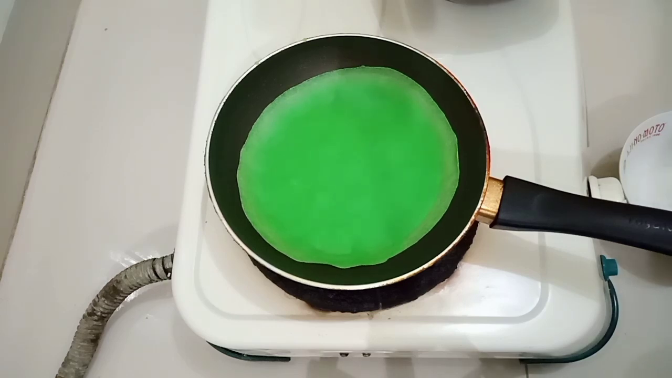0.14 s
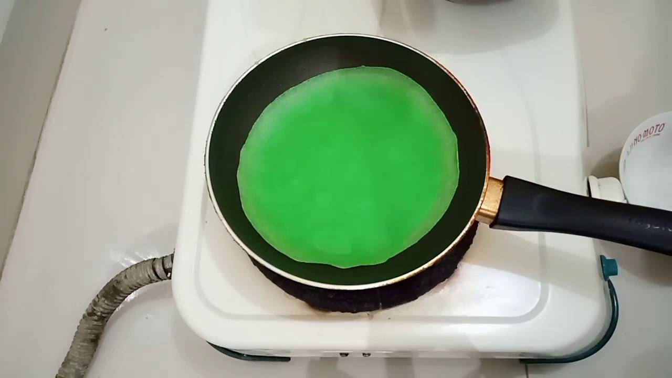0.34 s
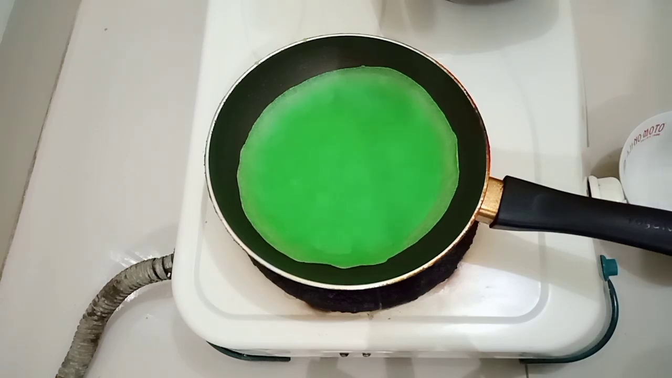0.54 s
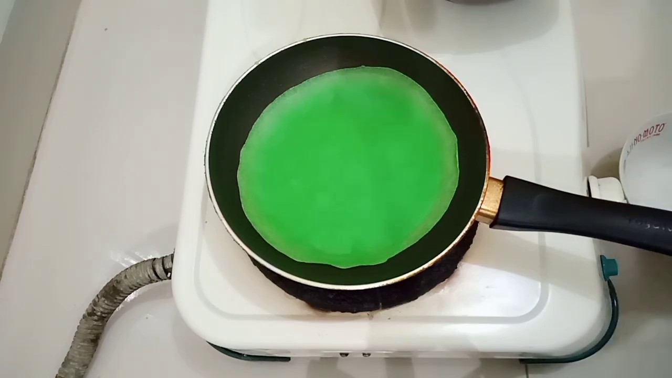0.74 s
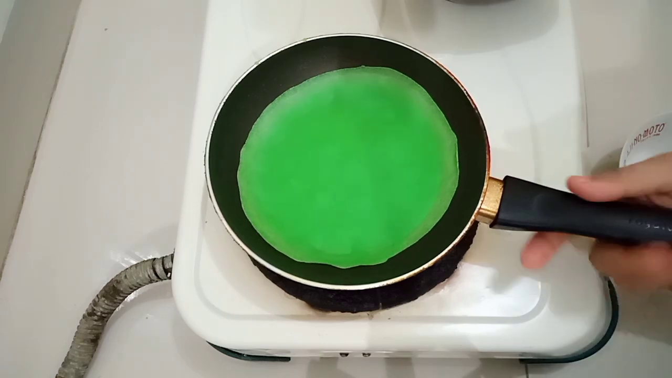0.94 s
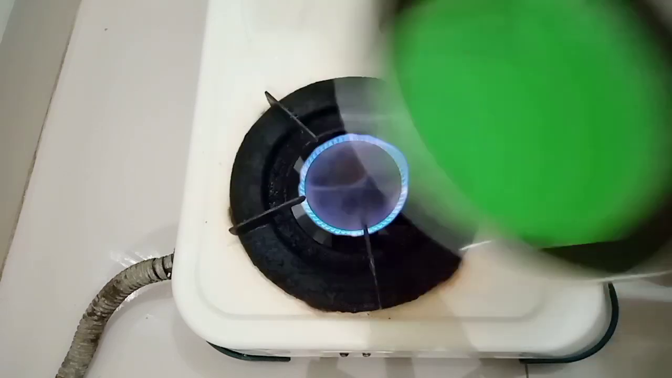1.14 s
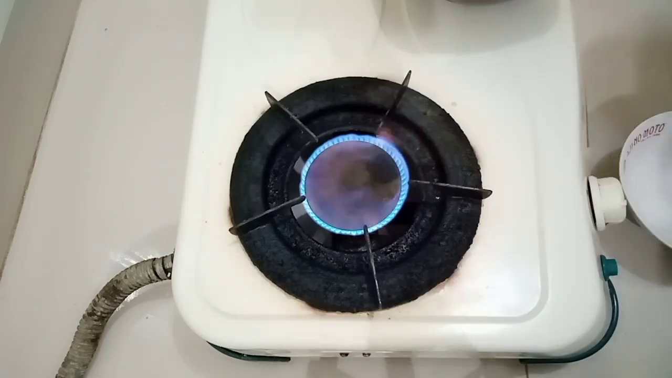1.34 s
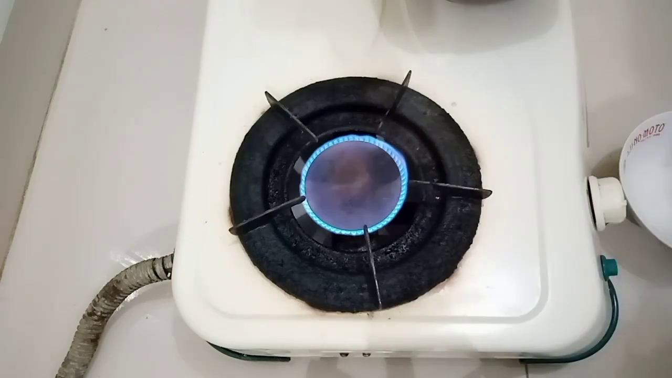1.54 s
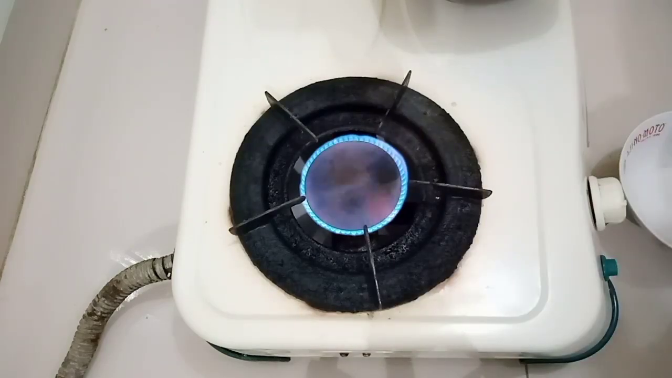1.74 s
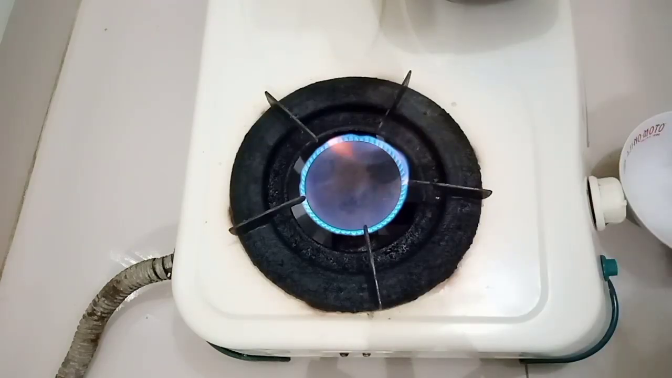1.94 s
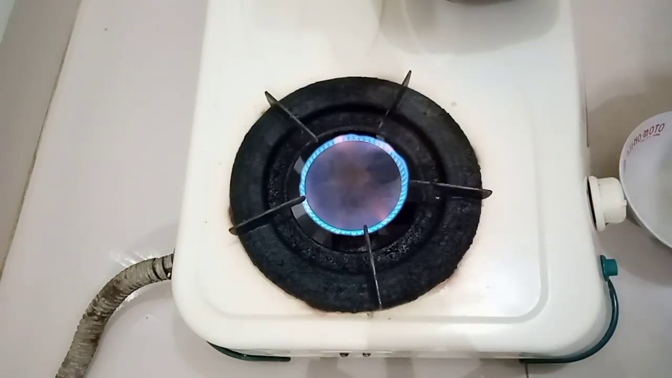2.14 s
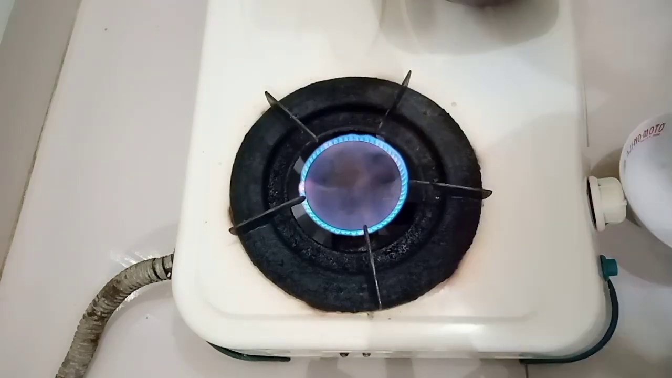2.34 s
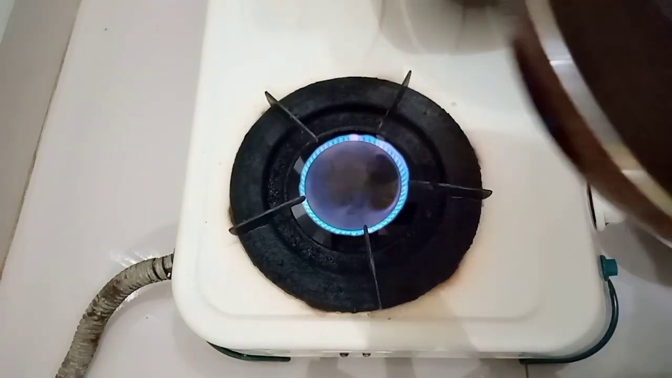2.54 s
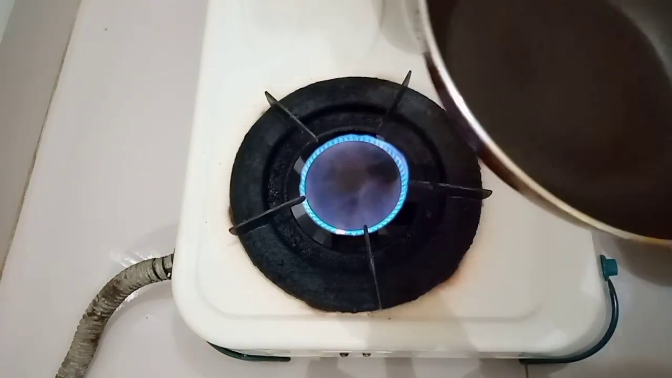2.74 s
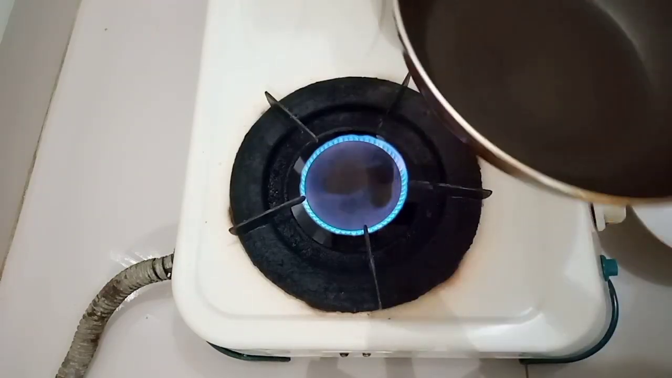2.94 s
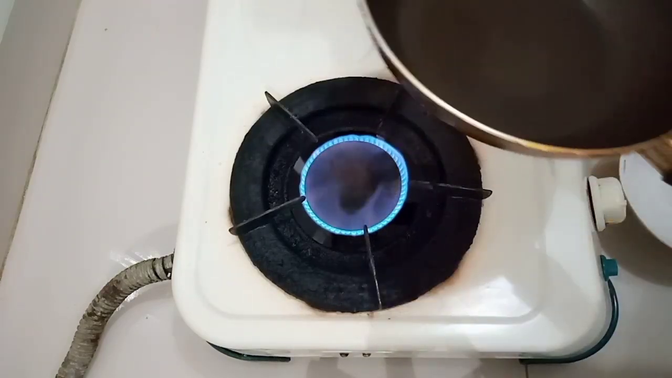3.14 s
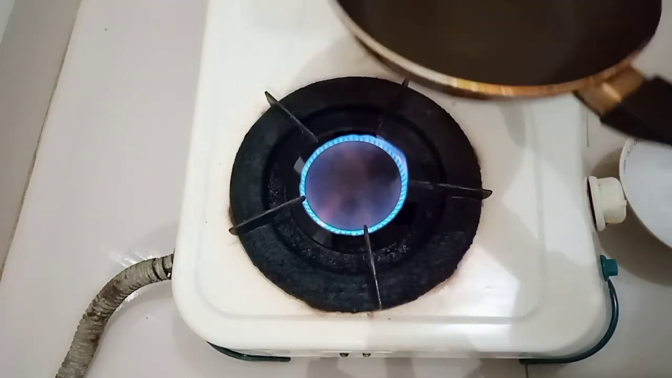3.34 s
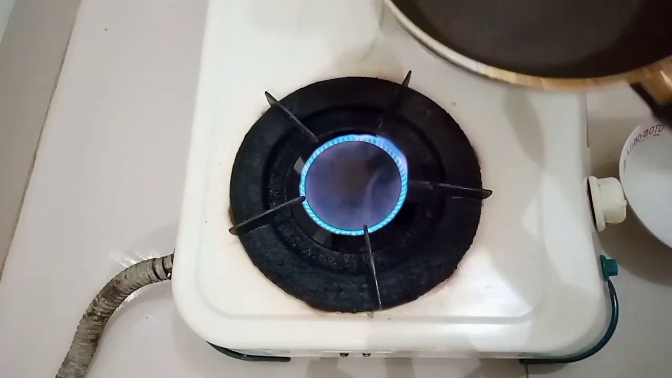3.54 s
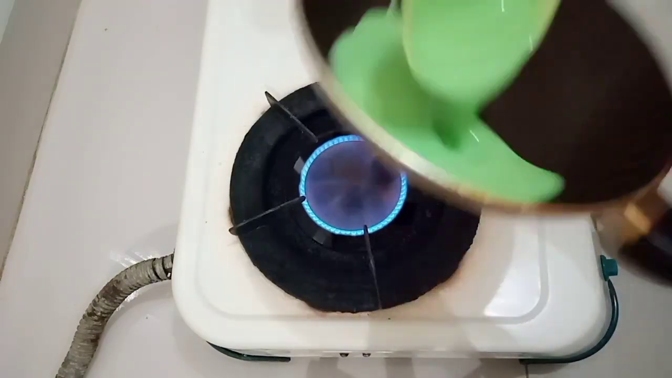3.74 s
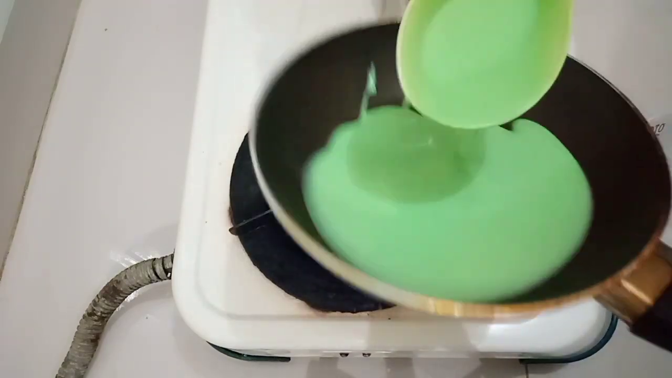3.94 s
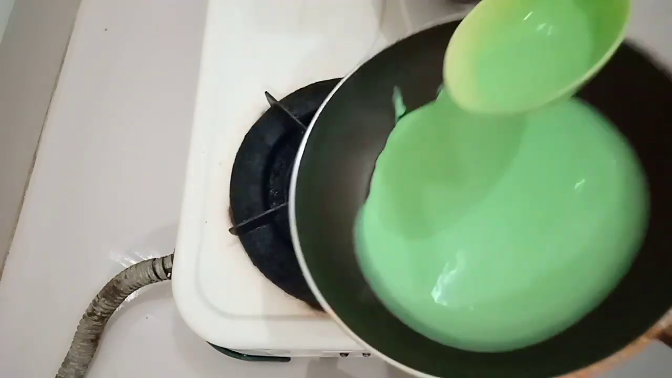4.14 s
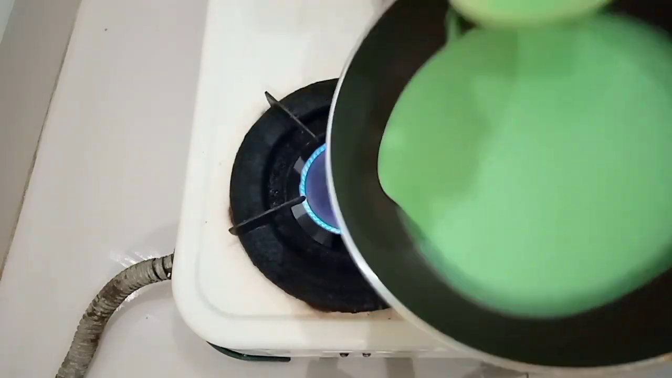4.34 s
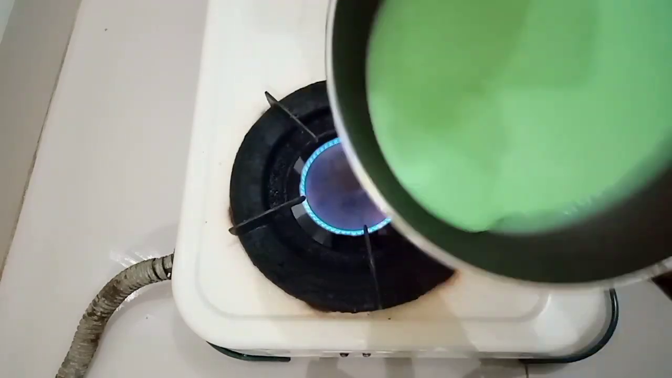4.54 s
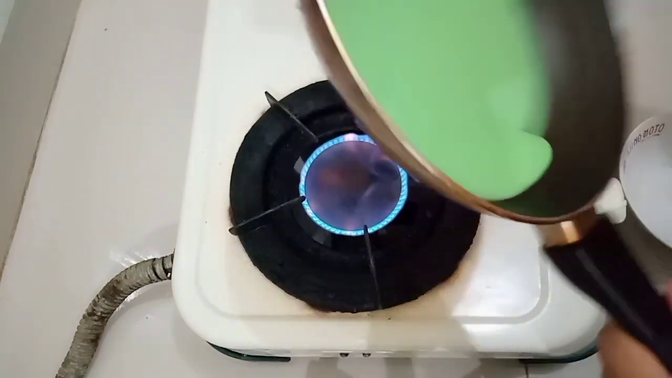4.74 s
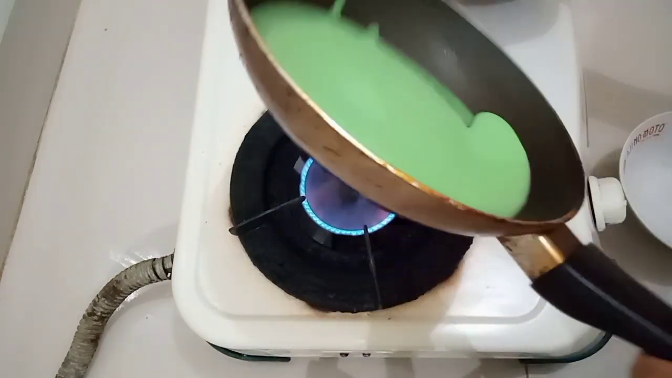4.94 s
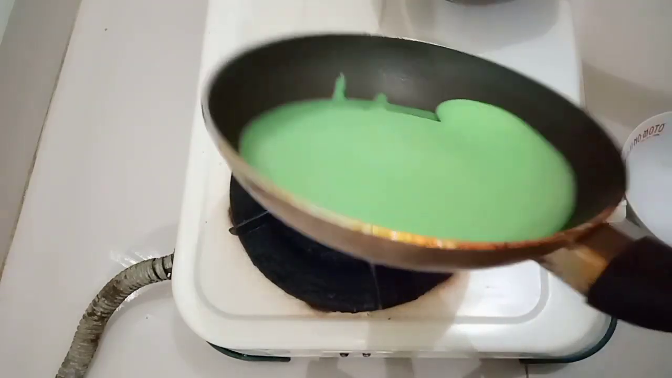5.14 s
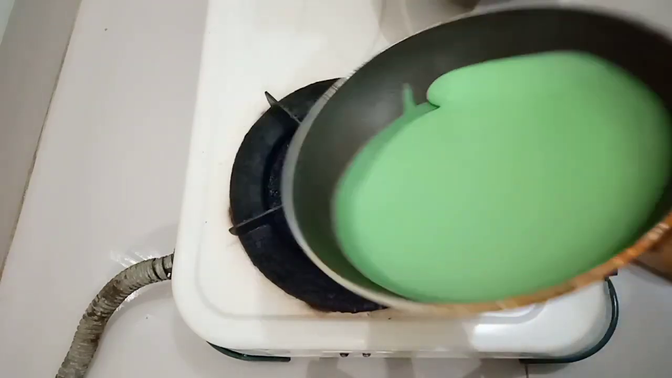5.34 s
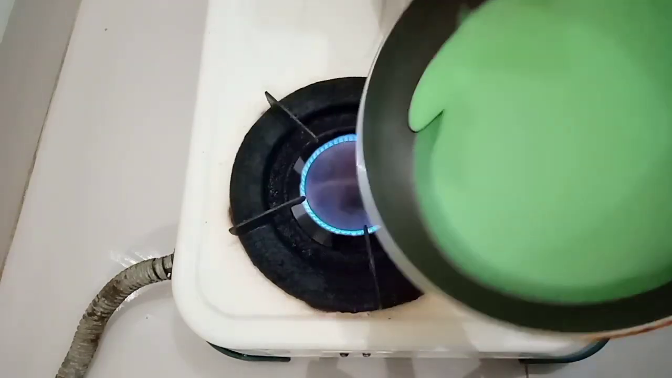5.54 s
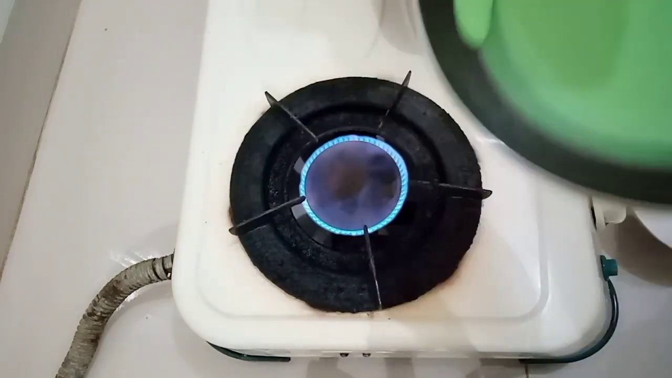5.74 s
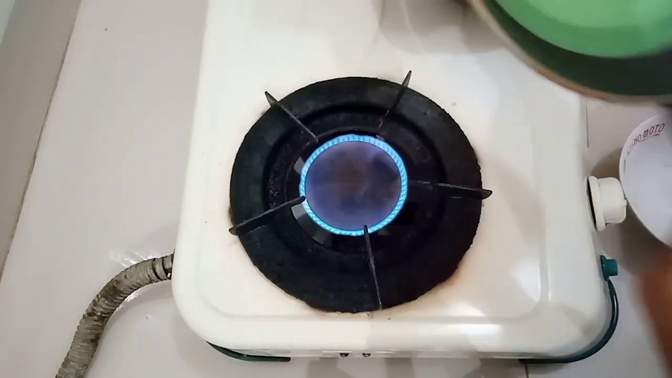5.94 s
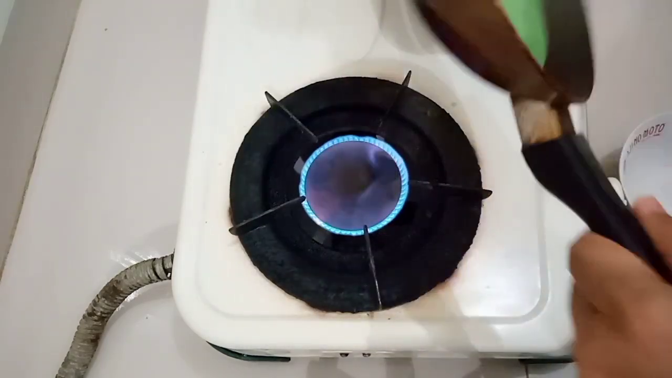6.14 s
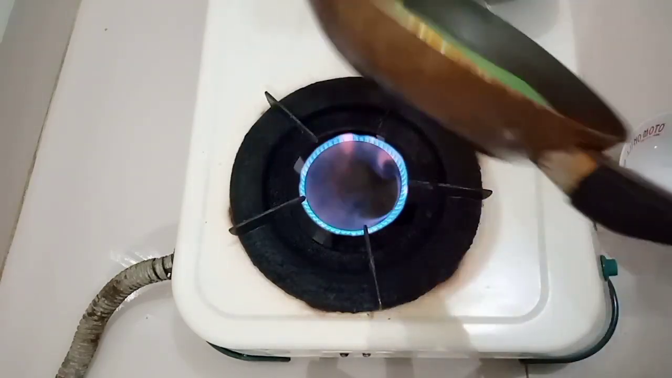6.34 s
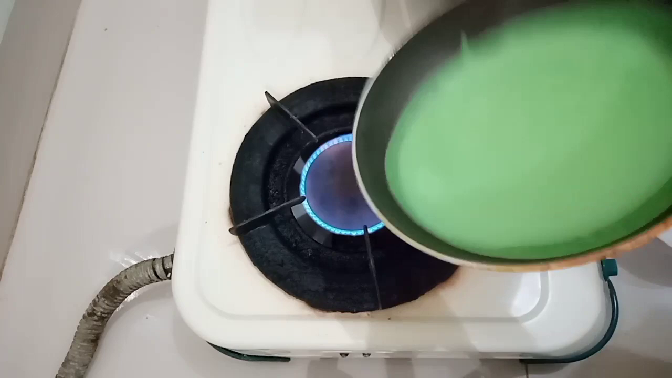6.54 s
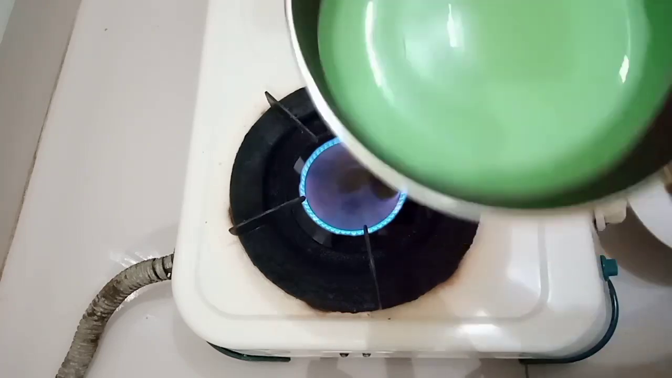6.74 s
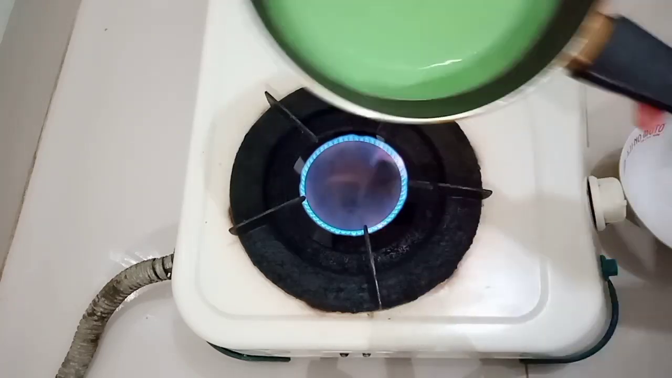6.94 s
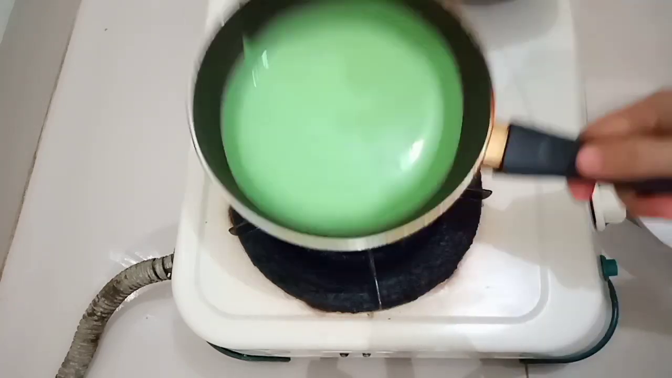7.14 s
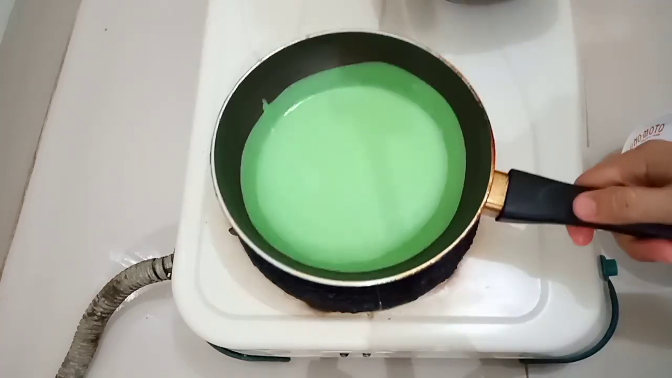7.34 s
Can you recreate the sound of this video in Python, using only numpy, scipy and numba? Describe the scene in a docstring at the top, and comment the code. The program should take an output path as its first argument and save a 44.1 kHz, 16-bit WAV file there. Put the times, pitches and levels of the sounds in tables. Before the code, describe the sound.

A phone-like close mono pickup, thin in the bass. Low gas flame murmurs throughout, with faint ticking fat at first. Steel rattles sharply as the first pan is lifted, then small clinks and a hard bowl knock. Pouring batter bursts into loud frying hiss, its tone shifting as the pan tilts, and gradually dies to sparse snaps and a metallic ping. The pan finally bangs and rocks on the grate.

```python
"""Pancakes on a gas ring

A small hard-walled kitchen, heard through a phone just above the stove: noise makes the fluttering flame,
an airy hiss and low gusts; narrow bands and a sine sing. Struck modes and clatter make a pan leaving the
iron grate, a ladle in the batter bowl and a second pan being set down; noise grains make rubs and a scuff.
Batter hits that hot second pan: dense random bursts sizzle as it is swirled, then thin to a crackle.
Fat ticks and spits, batter sloshes softly, short tones squeak, and the cooling pan pings."""
import sys
import numpy as np
from scipy import signal
from scipy.fft import rfft, irfft
from scipy.io import wavfile
from numba import njit

SR = 44100
rng = np.random.default_rng(int(sys.argv[2]) if len(sys.argv) > 2 else 0)


def unload_wav(signal):
    """Save mono or channel-first audio to the path in sys.argv[1] as 16-bit WAV at rate SR, clipped to [-1, 1]."""
    wavfile.write(
        sys.argv[1],
        SR,
        np.round(np.clip(np.atleast_2d(signal).T, -1, 1) * 32767).astype(np.int16),
    )


N = 326340
T = np.arange(N) / SR
RING_SAMPLES = SR // 2  # longest ring of a struck object
# first batter touches the second pan, and the time it takes to wet it (s)
TOUCH_S, WETTING_S = 3.515, 0.075

# Clatter of both steel pans: (frequency [Hz], level [dB])
STEEL_SPECTRUM = [(70, -60), (115, -11), (170, -8), (280, -9.5), (400, 2), (600, 2.5), (1000, -9),
                  (1400, 2), (1700, -10), (3000, -16), (5500, -14.5), (7000, -28.5), (10000, -45)]
# Gritty rubbing, also the ladle's clatter: (frequency [Hz], level [dB])
RUB_SPECTRUM = [(100, -25), (300, -11.5), (600, 7), (1400, -2), (2800, 2.5), (4000, 1), (5200, -11),
                (7200, -18), (9000, -35), (14000, -22)]
# Sharp snaps of fat and of hot metal: (frequency [Hz], level [dB])
SNAP_SPECTRUM = [(1000, -29), (5000, 3), (7500, 7), (10000, -13), (12000, -10)]


def amp(db):
    """Amplitude ratio of a level in dB."""
    return np.exp(np.asarray(db) * (np.log(10) / 20))


def unit(x):
    """Scale to an RMS of 1."""
    return x / np.sqrt(np.mean(x ** 2))


def noise():
    """White noise of unit power over the whole scene."""
    return rng.standard_normal(N)


def curves(table):
    """Every column of a table, joined by straight lines in time."""
    s, *columns = np.transpose(table)
    return [np.interp(T, s, c) for c in columns]


def convolve(x, response):
    """Apply an impulse response, cut to the scene's length."""
    return signal.oaconvolve(x, response)[:N]


def colour(x, spectrum, size=2048):
    """Causal minimum-phase filter through (Hz, dB) points; white noise keeps its power."""
    hz, db = np.transpose(spectrum)
    grid = np.maximum(np.arange(size // 2 + 1) * SR / size, 1)
    level_db = np.interp(np.log(grid), np.log(hz), db)
    cepstrum = irfft(np.log(amp(level_db)))
    # fold the cepstrum onto positive times, so that nothing sounds early
    cepstrum[1:size // 2] *= 2
    cepstrum[size // 2 + 1:] = 0
    response = irfft(np.exp(rfft(cepstrum)))
    return convolve(x, response / np.linalg.norm(response))


def band(x, hz, width):
    """A resonance that stays in place, gain 1 at its centre."""
    return signal.lfilter(*signal.iirpeak(hz, hz / width, fs=SR), x)


@njit
def resonance(x, hz, width):
    """Band-pass with moving centre and width, gain 1 at the top."""
    y = np.empty(len(x))
    band_state, low_state = 0., 0.
    for i in range(len(x)):
        g = np.tan(np.pi * hz[i] / SR)
        k = width[i] / hz[i]
        v = (band_state + g * (x[i] - low_state)) / (1 + g * (g + k))
        band_state = 2 * v - band_state
        low_state = low_state + 2 * g * v
        y[i] = k * v
    return y


def walk(rate):
    """Random wandering through `rate` new points per second, with a spread near 1."""
    points = rng.standard_normal(4096)
    return np.sqrt(3 / 2) * np.interp(T * rate, np.arange(len(points)), points)


def fade(t, t60):
    """Exponential decay by 60 dB in t60 seconds."""
    return amp(-60 * t / t60)


def bump(s, length):
    """A smooth bell-shaped swell around a moment."""
    return np.exp(-.5 * ((T - s) / length) ** 2)


def lagged(x, seconds):
    """Follow x slowly, with a time constant in seconds."""
    keep = np.exp(-1 / (seconds * SR))
    return signal.lfilter([1 - keep], [1, -keep], x)


def bursts(rate, spread_db):
    """Random clicks of near unit power at any rate: a positive spread gives many small, a few large."""
    chance = np.clip(rate / SR, 1e-5, 1)
    size_steps = np.minimum(rng.exponential(size=N), 6)
    size = unit(amp(spread_db * size_steps))
    happens = rng.random(N) < chance
    return happens * size * np.sign(noise()) / np.sqrt(chance)


def drifting_comb(x, db, sway_s, sway_rate, farthest_s, count=6):
    """Sum of delayed copies with slowly wandering delays; gives noise a drifting comb-like colour."""
    lags = np.geomspace(farthest_s / 4, farthest_s, count)
    copies = sum(np.interp(T - lag - sway_s * walk(sway_rate), T, x) for lag in lags)
    return (x + amp(db) * copies) / np.sqrt(1 + count * amp(db) ** 2)


def kitchen(x, wet_db, t60=0.31, gap=0.0043):
    """Close hard walls give a short, dense tail that loses its top."""
    t = T[:SR]
    dull = signal.lfilter(*signal.butter(1, 7000, fs=SR), rng.standard_normal(SR))
    tail = dull * fade(t, t60) * (t > gap)
    return x + amp(wet_db) * convolve(x, tail / np.linalg.norm(tail))


def body(modes, spectrum, clatter_db, clatter_t60, ring_share):
    """Answer to one tap: clear modes plus a quickly dying crowd of weaker ones."""
    t = T[:RING_SAMPLES]
    ring = 0
    for k, (hz, db, t60) in enumerate(modes):
        ring = ring + (-1) ** k * amp(db) * fade(t, t60 * ring_share) * np.sin(2 * np.pi * hz * t)
    clatter = colour(rng.standard_normal(len(t)) * fade(t, clatter_t60), spectrum)[:len(t)]
    return ring / np.linalg.norm(ring) + amp(clatter_db) * clatter / np.linalg.norm(clatter)


def strike(blows, modes, spectrum, clatter_db, clatter_t60, softness=.002):
    """Each blow builds up over its contact time, then rings; on a soft seat longer contact is duller."""
    out, t = np.zeros(N + SR), T[:RING_SAMPLES]
    for s, db, contact, ring_share in blows:
        start = int(s * SR)
        ring = body(modes, spectrum, clatter_db, clatter_t60, ring_share) * np.minimum(t / contact, 1)
        out[start:start + len(t)] += amp(db) * lagged(ring, softness * contact)
    return out[:N]


def stroke(s, db, rise, fall):
    """Pressure of a rub: it builds up evenly, then lets go exponentially."""
    release = np.exp(-np.maximum(T - s - rise, 0) / fall)
    return amp(db) * np.clip((T - s) / rise, 0, 1) * release


def burner(roar_db=-64.5, whistle_hz=958, whistle_db=-66):
    """The flame flutters in patches, the burner's cavities sing and one tone holds nearly steady."""
    # Roar of the flame: (frequency [Hz], level [dB])
    flame_spectrum = [(25, 7.5), (55, -3), (105, -4), (135, 2.5), (250, 0.5), (400, -8), (550, -8.5),
                      (750, -9.5), (1000, -8.5), (1400, -65.5), (3000, -39.5)]
    # The flame flares up or sinks: (time [s], half length [s], level above its steady roar [dB])
    flares = [(0.577, 0.051, 5), (2.128, 0.19, -3), (4.72, 0.45, 3), (5.24, .09, -2.5)]
    # Burner tube and head: (frequency [Hz], width before scaling in two passes [Hz], level before swell [dB])
    cavities = [(180.2, 9.8, -67), (255.8, 14.4, -70), (340.6, 11.3, -73), (974, 63, -68), (1051, 1.7, -78),
                (1137, 11.5, -76.5), (1936, 89, -80)]
    flutter = walk(22)
    flare_db = sum(db * bump(s, length) for s, length, db in flares)
    roar = colour(noise(), flame_spectrum)
    patches = sum(walk(13) * band(roar, hz, hz / 3) for hz in np.geomspace(130, 750, 5))
    flame = (roar + 0.49 * patches) * amp(roar_db + flare_db + 4.7 * flutter + 1.9 * walk(45))
    song = 0
    for hz, width, db in cavities:
        narrow = band(band(noise(), hz, 1.48 * width), hz, 5 * width)
        song = song + amp(db) * unit(narrow)
    swell = amp(1.5 * walk(7) + .7 * flutter)
    whistle_phase = 2 * np.pi * np.cumsum(whistle_hz + 0.71 * walk(9)) / SR
    whistle = amp(whistle_db) * np.sin(whistle_phase)
    return flame + swell * song + whistle


def airy_hiss(patchy=0.5, width_hz=700):
    """Airy hiss around the stove, swelling and fading, with bright patches coming and going."""
    # Colour of the hiss: (frequency [Hz], level [dB])
    hiss_spectrum = [(500, -1.5), (1500, -6), (2000, 2.5), (3500, 0.5), (5000, 0.5), (7000, -2.5),
                     (7600, -9.5), (8500, -9), (9700, -37), (12500, -22), (13500, -26), (15500, -45)]
    # Its slow course before patches and flicker: (time [s], level [dB])
    hiss_level = [(0, -71), (.13, -68), (.29, -71.5), (.85, -70), (1.08, -66), (1.18, -62.5), (1.46, -67.5),
                  (1.56, -73), (1.75, -59.5), (1.95, -70.5), (2.35, -70), (2.58, -71), (3.26, -71),
                  (3.48, -67.5), (6.9, -62.5), (7.15, -67.5), (7.25, -61)]
    air = drifting_comb(colour(noise(), hiss_spectrum), db=0.5, sway_s=0.00051, sway_rate=2.5, farthest_s=.006)
    patches = sum(walk(9) * band(air, hz, width_hz) for hz in np.linspace(1900, 7000, 8))
    return (air + patchy * patches) * amp(curves(hiss_level)[0] + 0.33 * walk(12))


def gusts_and_sloshes(width_share=0.37):
    """Short low gusts: puffs of the flame near 130-260 Hz, soft sloshes of batter near 600 Hz."""
    # Gusts and sloshes: (time [s], half length [s], centre [Hz], level [dB])
    swells = [(0.22, 0.05, 150, -59.5), (0.52, 0.075, 130, -61.5), (1.304, 0.022, 263, -61),
              (2.41, 0.024, 163, -57), (4.927, 0.011, 222, -52.5), (5.033, .025, 630, -60.5),
              (5.786, 0.12, 163, -59.5), (6.554, 0.046, 150, -58), (6.74, 0.059, 623, -65.5)]
    out = 0
    for s, length, hz, db in swells:
        width = width_share * hz
        gust = unit(band(band(noise(), hz, width), hz, 2 * width))
        out = out + amp(db) * bump(s, length) * gust
    return out


def crackle(rate=40, db=-84, gone_s=2.0, leaving_s=0.54):
    """Fat under the first pancake ticks faintly until its pan is carried away."""
    near = np.clip((gone_s - T) / leaving_s, 0, 1)
    ticks = colour(bursts(rate, spread_db=10.5), SNAP_SPECTRUM)
    return amp(db) * near * kitchen(ticks, wet_db=-20)


def utensils():
    """Everything handled around the stove; the room answers all but the squeaks."""
    metal = lift_first_pan() + land_second_pan() + knock_bowl() + clink_ladle()
    return kitchen(metal + rubs() + scuff(), wet_db=-9.0) + squeaks()


def rubs(grain_rate=7000, width_hz=700):
    """Short gritty swishes around the stove, each with one emphasised band."""
    # Swishes: (time [s], level of the stroke [dB], rise [s], fall [s], band centre [Hz])
    swishes = [(.605, -61, 0.0063, 0.025, 7050), (1.36, -63, 0.043, 0.038, 6600),
               (2.81, -65, 0.033, 0.044, 6550), (3.384, -62, 0.011, 0.022, 7040),
               (5.345, -51, 0.023, 0.0079, 1280)]
    grit = colour(bursts(grain_rate, spread_db=6.0), RUB_SPECTRUM)
    out = 0
    for s, db, rise, fall, hz in swishes:
        bright = unit(band(band(grit, hz, width_hz), hz, 2 * width_hz))
        out = out + stroke(s, db, rise, fall) * (grit + 0.92 * bright)
    return out


def squeaks(waver=0.015, ring=0.28, ring_t60=0.34):
    """Steam and the pan's base slipping on the grate give nearly pure tones that swell and ring out."""
    # Squeaks: (time [s], half length [s], pitch [Hz], level [dB])
    tones = [(0.79, 0.054, 6070, -69.5), (0.991, 0.0043, 1454, -42), (1.025, 0.015, 1722, -38.5)]
    out = 0
    for s, length, hz, db in tones:
        phase = 2 * np.pi * np.cumsum(hz * (1 + waver * walk(190))) / SR
        tail = ring * (T > s) * fade(np.abs(T - s), ring_t60)
        out = out + amp(db) * np.maximum(bump(s, length), tail) * np.sin(phase)
    return out


def lift_first_pan():
    """The first pan rattles off the iron grate, its ring shortened by the grip."""
    # Blows: (time [s], level [dB], contact time [s], share of the ring time left by the grip [1])
    blows = [(.9585, -20, 0.0016, .48), (.9648, -9.5, 0.00024, 0.44), (.9775, -16, 0.001, 0.4),
             (.9835, -19, 0.0018, 0.61), (.9975, -26, 0.0017, 0.39), (1.032, -31, 0.0038, 0.51)]
    # Modes of this pan: (frequency [Hz], level [dB], t60 before the grip [s])
    modes = [(180, -5, 0.54), (395, -3, 0.18), (475, -11, 0.17), (521, 6.5, 0.24), (566, 8, .3),
             (722, 1, 0.16), (1207, 3, .18), (1400, 7, 0.15), (1460, 9, 0.33), (1735, -6, .4),
             (1860, 4, 0.19), (2063, -7, 0.42), (4700, 2, 0.055)]
    return strike(blows, modes, STEEL_SPECTRUM, clatter_db=-1.5, clatter_t60=0.096, softness=0.015)


def spits(snap_db=-10, snap_t60=0.011, usual_t60=0.0024):
    """Each spit of fat snaps and rings briefly; the longer it rings, the softer its snap."""
    # Spits: (time [s], starting level of the ring [dB], pitch [Hz], ring t60 [s])
    drops = [(1.145, -42.5, 3350, 0.0024), (1.7723, -34, 5300, 0.0072), (1.775, -34, 3400, 0.0082),
             (6.383, -35, 4670, .003), (6.4706, -39, 4050, 0.003), (6.55, -35, 5900, 0.002),
             (6.576, -35, 4500, .002), (6.6467, -35, 3870, 0.0045), (6.723, -38, 2660, 0.0029),
             (6.767, -45, 4800, .002), (6.8105, -37.5, 4770, 0.0029), (6.9, -42, 5180, 0.0029)]
    rings, snaps, t = np.zeros(N + SR), np.zeros(N + SR), T[:SR // 10]
    for s, db, hz, t60 in drops:
        start = int(s * SR)
        span = slice(start, start + len(t))
        rings[span] += amp(db) * np.sin(2 * np.pi * hz * t) * fade(t, t60)
        snap = rng.standard_normal(len(t)) * fade(t, snap_t60)
        snaps[span] += amp(db + snap_db) * np.sqrt(usual_t60 / t60) * snap
    return kitchen(rings[:N] + colour(snaps[:N], SNAP_SPECTRUM), wet_db=-13.5)


def clink_ladle():
    """The ladle clinks, ringing a few high modes."""
    # Clinks: (time [s], level [dB], contact time [s], share of the ring time [1])
    clinks = [(1.955, -24, .0004, 0.76), (2.243, -30, 0.0028, 0.4)]
    # Modes of the ladle: (frequency [Hz], level [dB], t60 before that share [s])
    modes = [(1853, 4, 0.28), (1790, -3, 0.41), (3451, -0.5, 0.18), (5780, 2.5, 0.08)]
    return strike(clinks, modes, RUB_SPECTRUM, clatter_db=-6.0, clatter_t60=0.35)


def scuff(grain_rate=3000, grit_db=1.5):
    """The second pan is picked up: its base sticks and slips, ringing a body and a bright scrape."""
    # What the scuff rings: (frequency [Hz], width of the narrower pass [Hz], level before the stroke [dB])
    scraped = [(545, 200, -5), (1650, 120, -13), (3640, 1040, -1)]
    slips = bursts(grain_rate, spread_db=-3.0)  # mostly large, a few small
    ring = sum(amp(db) * unit(band(band(slips, hz, width), hz, 2 * width)) for hz, width, db in scraped)
    grit = amp(grit_db) * colour(slips, RUB_SPECTRUM)
    return stroke(2.629, db=-54.5, rise=.013, fall=.05) * (ring + grit)


def knock_bowl():
    """The ladle knocks in the batter bowl."""
    # Blows: (time [s], level before the bowl's trim [dB], contact time [s], share of the ring time [1])
    blows = [(2.987, -9.5, 0.00034, 0.37), (2.9915, -19, 0.0011, 0.79), (3.005, -19.5, 0.0018, 0.44)]
    # Modes of the bowl: (frequency [Hz], level [dB], t60 before that share [s])
    modes = [(590, 0, 0.55), (890, -9, 0.22), (1250, -2, 0.56), (1880, 3, 0.16), (2100, -4, 0.13),
             (2540, 15.5, 0.2), (3175, 20.5, 0.1), (3730, 1.5, 0.14), (7000, -7, 0.16)]
    # Clatter of the bowl: (frequency [Hz], level [dB])
    bowl_spectrum = [(150, -9), (600, -2.5), (1100, 5.5), (1450, -9), (2000, 1.5), (3300, -2.5),
                     (4700, -14), (6300, -9.5), (8000, -28), (14000, -43)]
    return amp(-4.0) * strike(blows, modes, bowl_spectrum, clatter_db=-1.5, clatter_t60=0.16)


def sizzle():
    """Steam bursts out under the batter: a hiss while it boils hard, separate crackles as it sets."""
    # Small bubbles: (frequency [Hz], level [dB])
    fry_spectrum = [(300, -40.5), (1500, -21.5), (2000, -12.5), (2700, -2), (4000, 0), (5200, -0.5),
                    (7000, 0), (7700, -6), (8600, -9.5), (10000, -25), (12000, -42.5)]
    # Large bubbles: (frequency [Hz], level [dB])
    large_spectrum = [(120, -48), (400, -31), (600, -18.5), (800, -14), (1200, -4), (1500, 1), (2100, -0.5),
                      (2800, 2), (5000, -57)]
    # Finest spray: (frequency [Hz], level [dB])
    spray_spectrum = [(7000, -15.5), (10000, -14), (11500, -4.5), (13500, -7), (15500, -11.5)]
    # burst rates (1/s) rise steeply from a simmer as the boil nears its full level
    simmer_rate, full_rate, full_boil_db, thinning = 120, 44000, -41, 1.4
    # large bubbles need time (s) and a strong boil to grow; the spray comes at once
    large_db, grow_s, large_needs_db, spray_db = -8.5, 0.11, -60.5, -18.5
    # the first bubbles are all tiny, so the hiss starts thin: how long, and the band it lacks
    young_s, thin_hz, thin_width_hz = 0.1, 2010, 1700
    boil = boiling()
    rate = simmer_rate + full_rate * (boil / amp(full_boil_db)) ** thinning
    small = bursts(rate, spread_db=3.5)
    large = bursts(.5 * rate, spread_db=0.5)
    hiss = colour(small, fry_spectrum)
    young = np.exp(-np.maximum(T - TOUCH_S, 0) / young_s)
    thin_hiss = hiss - young * band(hiss, thin_hz, thin_width_hz)
    grown = np.maximum(lagged(boil, grow_s) - amp(large_needs_db), 0)
    fry = boil * thin_hiss + amp(large_db) * grown * colour(large, large_spectrum)
    ringing = hollow(fry + 1e-18)  # the tiny offset keeps the filters off zero
    coloured = drifting_comb(ringing, db=-21.5, sway_s=0.000274, sway_rate=2.2, farthest_s=.005)
    spray = amp(spray_db) * boil * colour(small, spray_spectrum)
    return kitchen((coloured + spray) * amp(0.61 * walk(40)), wet_db=-22.5)


def boiling():
    """Each wetting of bare metal swells, then dies away as the batter sets; their powers add."""
    # Batter poured, then swirled: (time of the height [s], level [dB], rise [s], dying away [dB/s])
    wettings = [(3.641, -30, 0.042, 17), (3.75, -39.5, 0.098, 19), (4.578, -36, 0.3, 16.5),
                (5.521, -45, 0.28, 21.5), (5.79, -39, 0.15, 33.5), (6.46, -54.5, 0.077, 24),
                (6.78, -56, 0.15, 38)]
    power = 0
    for s, db, rise, fall_db_per_s in wettings:
        swell = np.exp(-(np.minimum(T - s, 0) / rise) ** 2)
        power = power + swell * amp(db - fall_db_per_s * np.maximum(T - s, 0)) ** 2
    return np.sqrt(power) * np.clip((T - TOUCH_S) / WETTING_S, 0, 1)


def hollow(x, patchy=0.2, patch_width_hz=450, patch_rate=11):
    """Resonances slide as the pool spreads and the pan tilts, narrower when strong; bright bands flicker."""
    # Lowest resonance: (time [s], frequency [Hz], strength [1])
    low_ring = [(3.58, 1760, 5.7), (3.7, 1610, 2.1), (3.88, 1470, 1.3), (4.42, 1510, 0.86),
                (4.72, 1590, 0.12), (5, 1700, 0.45), (6.55, 1800, 0.17), (6.72, 1910, 4.4)]
    # Middle resonance: (time [s], frequency [Hz], strength [1])
    mid_ring = [(3.6, 3360, 2.2), (3.7, 3050, 1.1), (3.8, 2520, 1.06), (4.15, 2380, 0.78),
                (4.5, 2700, 0.94), (4.7, 3100, 0.42), (4.87, 3300, 2.1), (5, 3140, 0.67), (5.1, 2900, 0.29),
                (5.55, 2940, 0.15), (5.8, 2950, 1.06), (6.1, 2500, 0.26)]
    # High resonance: (time [s], frequency [Hz], strength [1])
    high_ring = [(3.62, 5600, 1.3), (3.8, 5240, 0.84), (4.15, 4200, .45), (4.4, 4800, 0.24),
                 (4.8, 5270, 2.4), (4.96, 5670, .8), (5.04, 4530, 1.5), (5.32, 4500, 0.68),
                 (5.55, 4630, .2), (5.7, 5070, 2.4), (5.86, 5000, 0.19), (6.1, 4900, 0.25), (6.3, 4300, .8)]
    # The hiss gathers in one band: (time [s], half length [s], frequency [Hz], width [Hz], strength [1])
    surges = [(4.697, .05, 6300, 300, 1.1), (5.483, 0.26, 6660, 900, .6), (5.966, 0.045, 4870, 160, 3.2)]
    out, total = x, 0
    # each width (Hz) holds at strength 1
    for table, width in ((low_ring, 270), (mid_ring, 950), (high_ring, 590)):
        hz, strength = curves(table)
        out = out + strength * resonance(x, hz, width / np.sqrt(np.maximum(strength, .1)))
        total = total + strength
    for s, length, hz, width, strength in surges:
        out = out + strength * bump(s, length) * band(x, hz, width)
    patches = sum(walk(patch_rate) * band(x, hz, patch_width_hz) for hz in np.linspace(1800, 7400, 10))
    # strong resonances turn the whole down a little
    return (out + patchy * patches) / (1.12 + 0.13 * total)


def pings():
    """The hot pan's metal ticks brightly as the batter cools it and it shrinks."""
    # Pings: (time [s], level [dB], contact time [s], share of the ring time [1])
    ticks = [(6.5355, -13, 0.00042, 0.77), (7.1993, -23.5, 0.0018, 0.92)]
    # Modes of a ping: (frequency [Hz], level [dB], t60 before that share [s])
    modes = [(3770, -3.5, 0.025), (5650, -12, 0.021), (7000, -1, 0.015), (8230, -12, 0.012)]
    return kitchen(strike(ticks, modes, SNAP_SPECTRUM, clatter_db=-0.5, clatter_t60=0.0094), wet_db=-19)


def land_second_pan():
    """The second pan lands and rocks on the grate, its ring shortened by the grip."""
    # Blows: (time [s], level [dB], contact time [s], share of the ring time left by the grip [1])
    blows = [(7.2905, -2.5, 0.00083, 0.25), (7.2971, -5.5, 0.0016, 0.18), (7.3038, -15.5, 0.0012, .6),
             (7.3137, -13, 0.0018, .7), (7.3402, -14, .0015, .7), (7.3535, -11.5, 0.0021, 0.46),
             (7.3585, -18, .0018, 0.54), (7.38, -11.5, 0.0022, .6)]
    # Modes of this pan: (frequency [Hz], level [dB], t60 before the grip [s])
    modes = [(345, 0, 0.32), (399, 3, 0.27), (545, 7.5, .3), (604, 8.5, 0.32), (702, 3, .16),
             (739, 3, 0.24), (844, 0, 0.41), (1204, -5, 0.13), (1380, 7, .11), (1455, 7, 0.17),
             (1740, -5, .2), (2030, -2, .22), (2440, -7.5, .1), (2940, -1, 0.15), (3165, -6, .11),
             (3420, 2, 0.17), (4200, -3, .14), (5530, -2, 0.13)]
    return strike(blows, modes, STEEL_SPECTRUM, clatter_db=-1, clatter_t60=0.092, softness=0.037)


def scene():
    """All sources at the stove, summed to one channel."""
    stove = burner() + airy_hiss() + gusts_and_sloshes()
    return (stove + crackle() + utensils() + spits() + sizzle() + pings())[None]


def record(dry, bass_hz=115, top_hz=15600):
    """The phone thins the bass and cuts the top steeply."""
    thin = signal.sosfilt(signal.butter(2, bass_hz, "high", fs=SR, output="sos"), dry)
    return signal.sosfilt(signal.ellip(10, .2, 70, top_hz, fs=SR, output="sos"), thin)


dry = scene()
out = record(dry)
unload_wav(out)
```